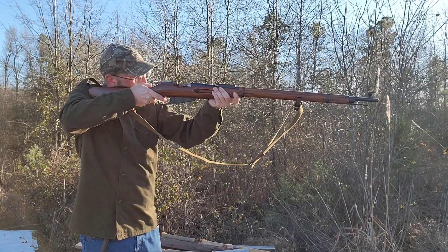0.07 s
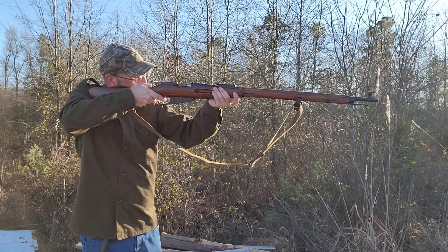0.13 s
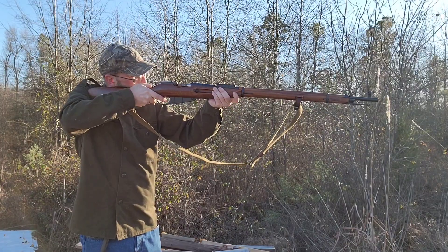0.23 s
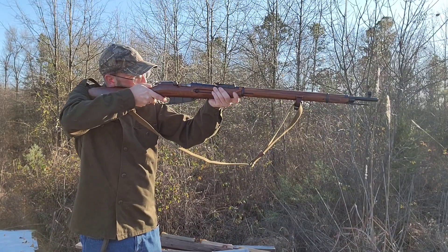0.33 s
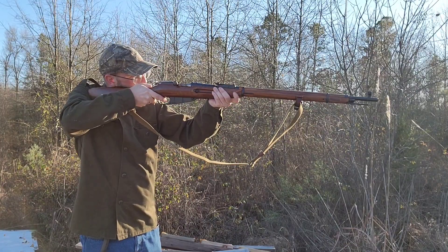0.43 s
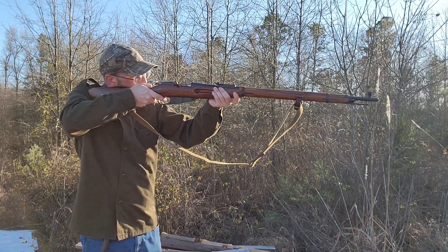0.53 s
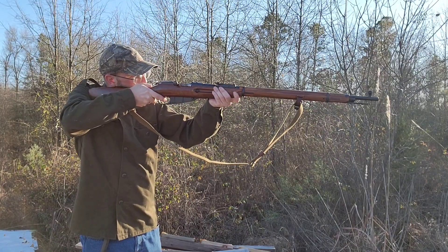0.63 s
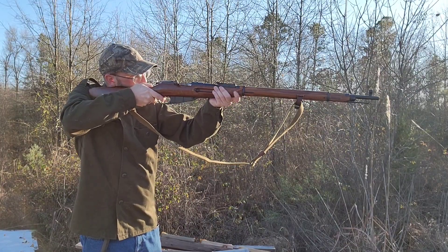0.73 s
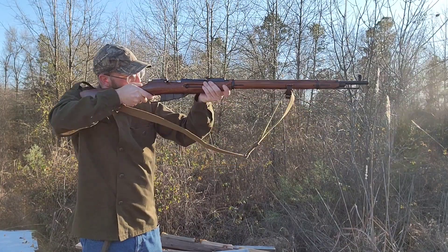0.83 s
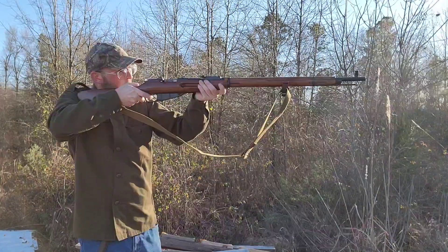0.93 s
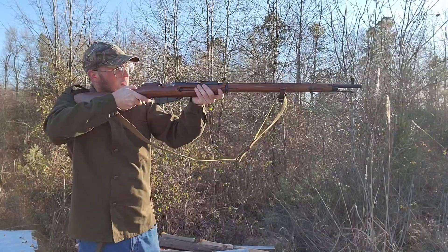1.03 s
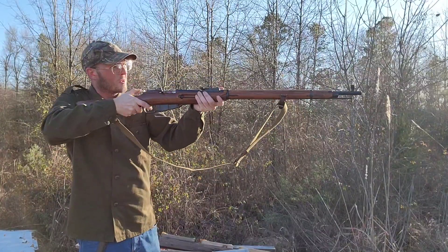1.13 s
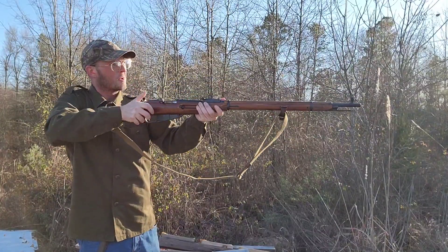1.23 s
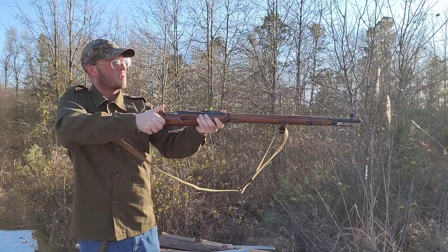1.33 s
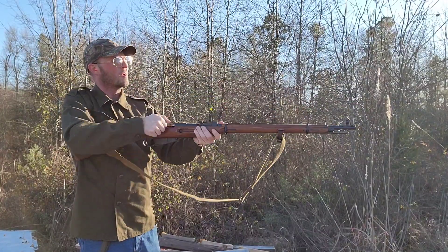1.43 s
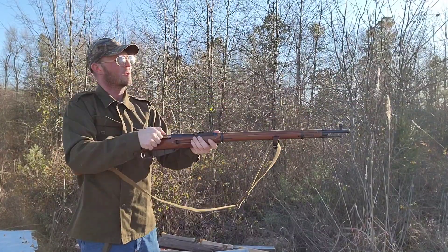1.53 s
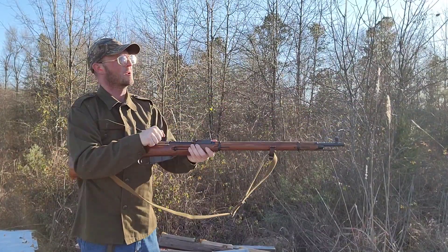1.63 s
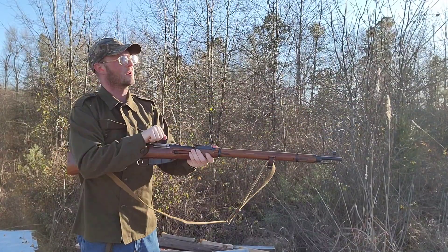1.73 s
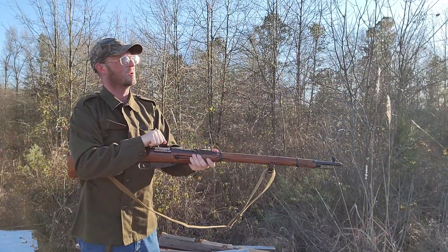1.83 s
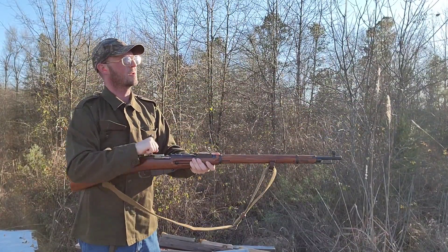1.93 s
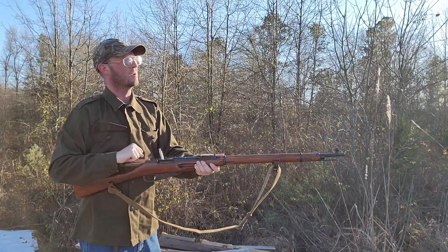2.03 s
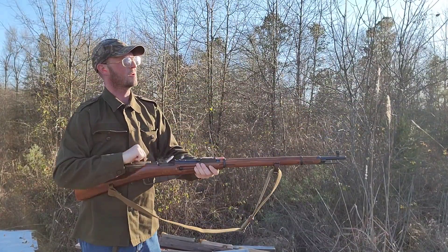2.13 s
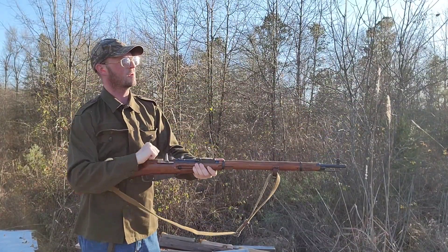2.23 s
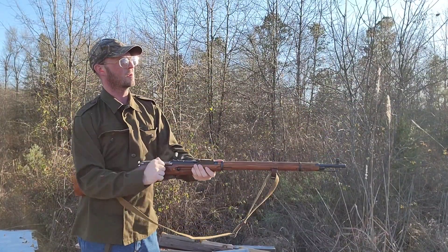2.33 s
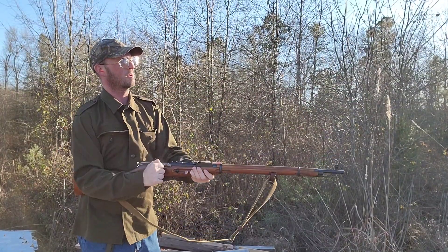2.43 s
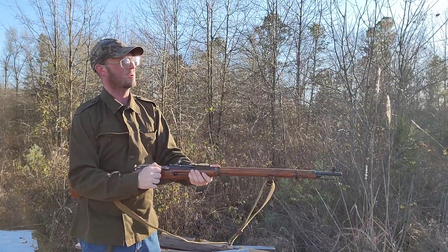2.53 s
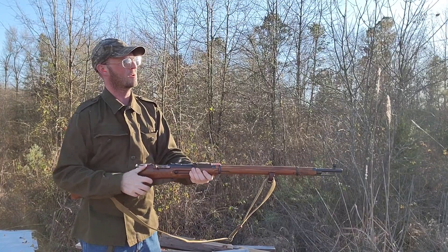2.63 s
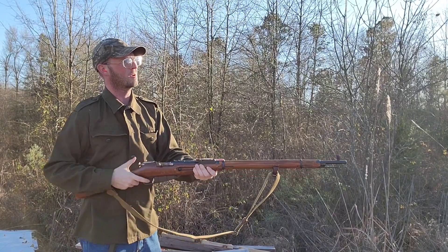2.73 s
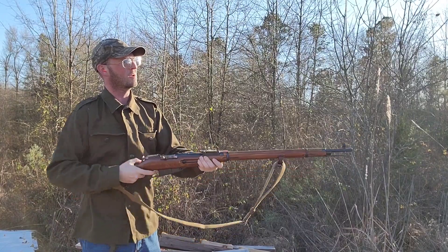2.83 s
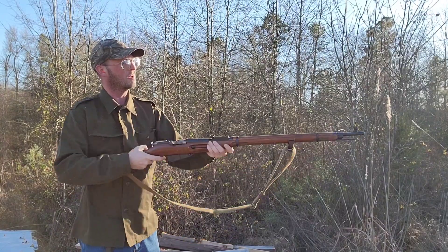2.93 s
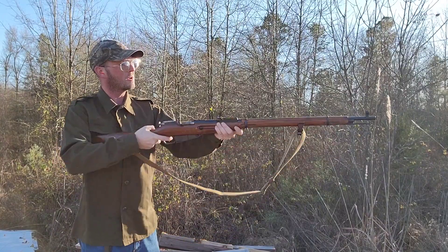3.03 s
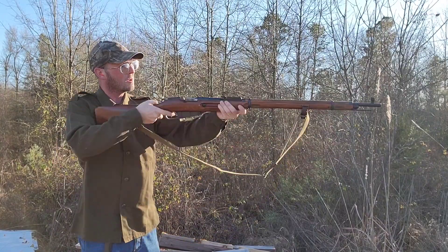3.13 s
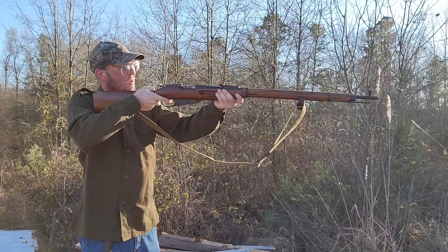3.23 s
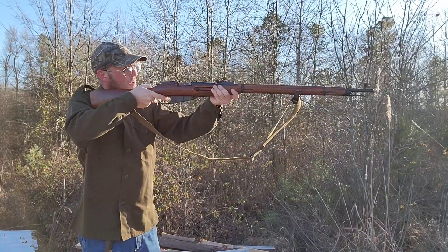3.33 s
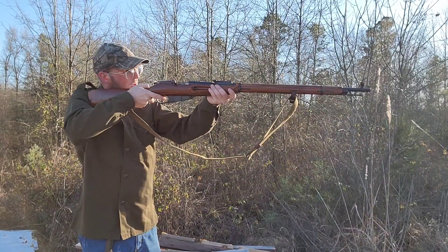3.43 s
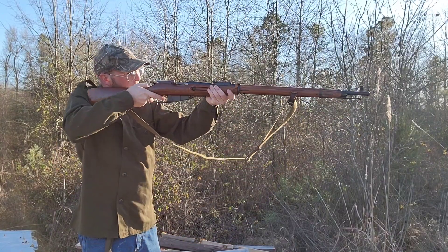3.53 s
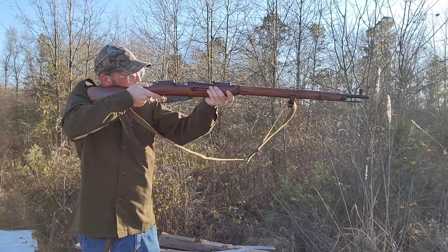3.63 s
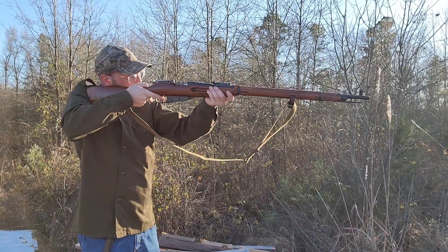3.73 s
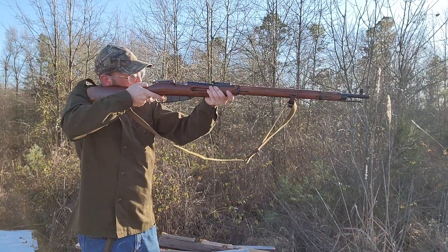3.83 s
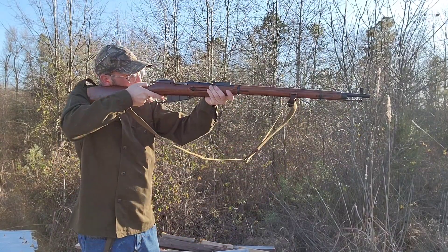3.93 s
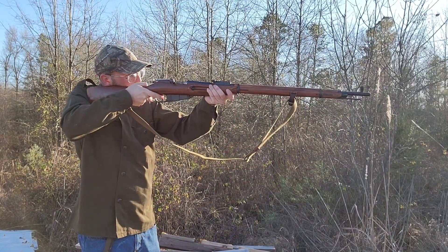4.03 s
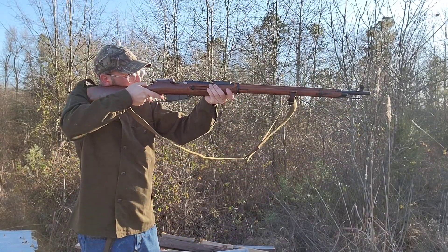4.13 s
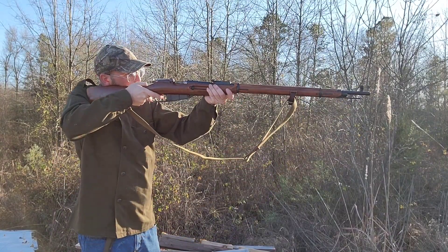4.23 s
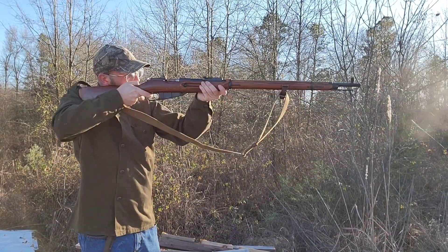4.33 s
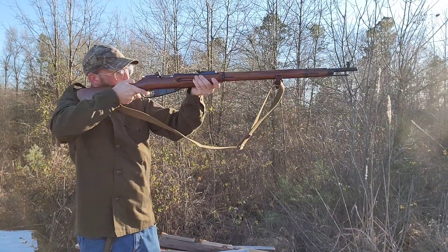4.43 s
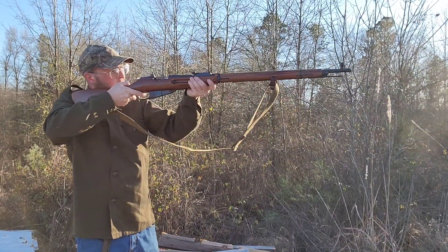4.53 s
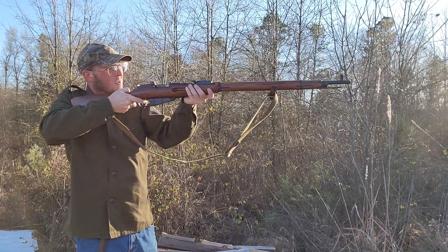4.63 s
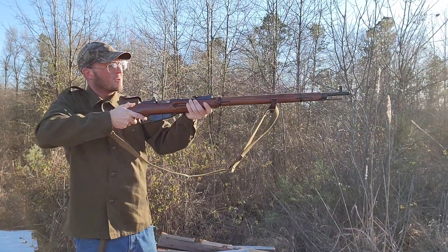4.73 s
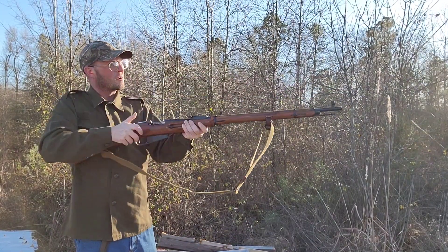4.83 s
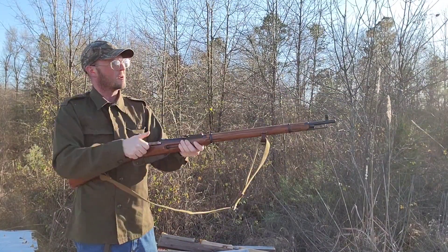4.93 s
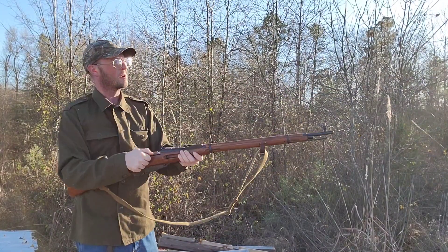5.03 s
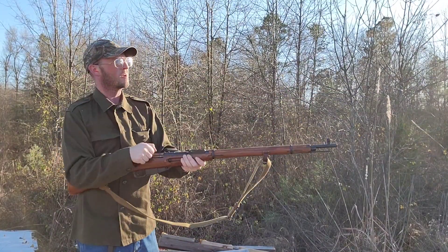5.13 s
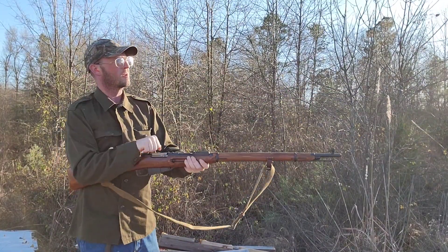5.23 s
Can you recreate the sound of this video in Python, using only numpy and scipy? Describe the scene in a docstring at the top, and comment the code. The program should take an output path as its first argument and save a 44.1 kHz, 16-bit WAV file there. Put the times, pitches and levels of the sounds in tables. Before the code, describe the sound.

Two loud close rifle blasts with deep booms and rolling woodland echoes; steel bolt clacks, a small clink and stock slaps separate them.

```python
"""At the edge of a wood, a bolt-action rifle is fired twice, a few steps from a pair of microphones.
Each blast is a dense noise burst with heavy air pushes, a deep boom and a hiss of twigs, then rolls away
among the trunks as scattered impulses; stands of trees answer with short pulses. Steel chatter makes the
bolt work after each shot, the second time faintly. Between the shots come resonant knocks on the stock, a
clinking case, a jingling sling ring and a brief strap swish, over rumbling wind and a faint outdoor hush."""
import sys
import numpy as np
from scipy import signal
from scipy.fft import rfft, irfft, next_fast_len
from scipy.io import wavfile
from scipy.ndimage import map_coordinates

SR = 44100
rng = np.random.default_rng(int(sys.argv[2]) if len(sys.argv) > 2 else 0)


def wav_out(sig):
    """Save sig, one row per channel (or a flat mono array), as 16-bit PCM at SR to the path in sys.argv[1]."""
    wavfile.write(sys.argv[1], SR, np.round(np.clip(np.atleast_2d(sig).T, -1, 1) * 32767).astype(np.int16))


N = 232620  # length in samples


def amp(db):
    """Decibels to gain."""
    return 10 ** (np.asarray(db) / 20)


def unit(x):
    """x at rms 1."""
    return x / np.sqrt(np.mean(x ** 2) + 1e-20)


def noise(n):
    """Independent white noise for the two microphones."""
    return rng.standard_normal((2, n))


def decay(t, t60):
    """Exponential fade that loses 60 dB in t60 seconds."""
    return amp(-60 * t / t60)


def along(points, hz):
    """(Hz, value) points read on a log frequency axis."""
    f, v = np.transpose(points)
    return np.interp(np.log(hz + 1), np.log(f + 1), v)


def clock(seconds):
    """Sample times from zero."""
    return np.arange(int(seconds * SR)) / SR


def add(track, s, sound):
    """Mix a sound into a stereo track at time s, cut at the track's end."""
    part = track[:, round(s * SR):][:, :sound.shape[-1]]
    part += sound[..., :part.shape[1]]


def filtered(x, response):
    """x through a frequency response, with padding so the ends do not wrap."""
    n = x.shape[-1]
    m = next_fast_len(n + 8192)
    return irfft(rfft(x, m) * response(np.fft.rfftfreq(m, 1 / SR)), m)[..., :n]


def coloured(x, spectrum):
    """x shaped by a (Hz, dB) spectrum, at rms 1."""
    return unit(filtered(x, lambda hz: amp(along(spectrum, hz))))


def band(x, lo_hz, hi_hz, order=2):
    """Causal band-pass."""
    return signal.sosfilt(signal.butter(order, [lo_hz, hi_hz], 'band', fs=SR, output='sos'), x)


def resonate(x, modes):
    """x through parallel (Hz, width, dB) resonances of alternating sign."""
    def response(f):
        total = 0
        for k, (centre, width, db) in enumerate(modes):
            damping = 1j * f * width
            total = total + (-1) ** k * amp(db) * damping / (centre * centre - f * f + damping)
        return total
    return filtered(x, response)


def ringing(modes, t, rise, uneven_db):
    """Stereo ring of (Hz, dB, t60) modes, at new strengths for every touch."""
    tones = 0
    for hz, db, t60 in modes:
        level = amp(db + uneven_db * rng.normal())
        phase = rng.uniform(0, 2 * np.pi) + np.array([[0], [1.2]])
        tones = tones + level * decay(t, t60) * np.sin(2 * np.pi * hz * t + phase)
    return tones * (1 - np.exp(-t / rise))


def faded(x, gain_db):
    """x under a gain that depends on frequency and time."""
    hz, t, z = signal.stft(x, SR, nperseg=256)
    z = z * amp(gain_db(hz[:, None], t))
    return signal.istft(z, SR, nperseg=256)[1][:, :x.shape[-1]]


def scatter(n, uneven_db, count=9000):
    """Tiny impulses from all around, count a second: each reaches the two microphones with its own lag."""
    k = count * n // SR
    at = rng.uniform(0, n, k)
    lag = .00025 * SR * np.cos(rng.uniform(0, 2 * np.pi, k))
    sign = rng.choice([-1, 1], k)
    size = sign * amp(uneven_db * np.clip(rng.standard_normal(k), -2, 2.4))
    sides = []
    for side in (-1, 1):
        arrival = np.clip(at + side * lag, 0, n - 1).astype(int)
        sides.append(np.bincount(arrival, size, n))
    return unit(np.array(sides))


def clumps(hz, age, width_hz, length):
    """Each clump of trees favours its own pitches: a smooth random field over frequency and time."""
    rows, columns = np.broadcast_arrays(hz / width_hz, age / length)
    return map_coordinates(rng.standard_normal((160, 800)), [rows, columns], order=2)


# The two shots. Each row: start in seconds, roar level in dB, woods level in dB, twig hiss level in dB,
# attack in seconds.
RIFLE_SHOTS = [(0.7581, -12.5, -28.5, -16, .016), (4.3095, -13, -29.5, -17.5, 0.021)]


def shots():
    """Both blasts: the direct roar, air pushes and boom, then what the twigs and trees send back."""
    out = np.zeros((2, N))
    for s, roar_db, woods_db, twigs_db, attack in RIFLE_SHOTS:
        add(out, s, amp(roar_db) * roar(attack))
        add(out, s, pushes(uneven_db=4))
        add(out, s, amp(roar_db - 10) * boom(spread_db=-3, t60=0.45))
        add(out, s, amp(twigs_db) * twigs())
        add(out, s, amp(woods_db) * woods())
        add(out, s, tree_lines())
    return band(out, lo_hz=41.3, hi_hz=21000)


# Colour of the close blast. Each row: frequency in Hz, density in dB per Hz.
ROAR_SPECTRUM = [(18, -35), (35, 0), (130, 1.5), (350, -7), (486, -13), (720, -10), (1160, -11.5),
                 (2600, -13.5), (3200, -16), (4800, -19.5), (7200, -19), (8400, -29), (10700, -26.5),
                 (12400, -15), (15400, -15.5), (16100, -24.5)]
# Resonances of the microphone housing. Each row: frequency in Hz, width in Hz, level in dB.
HOUSING_MODES = [(339, 24, 2.5), (715.5, 21, -1), (947, 23, -3.5), (1777, 30, -5), (2060, 100, -9.5),
                 (2370, 35, -9), (2980, 24, -7.5), (3186, 180, -6), (3560, 17, -9), (3900, 76, -7.5)]
# How long the roar holds. Each row: frequency in Hz, time until it starts to die in seconds.
ROAR_HOLD = [(100, 0.027), (700, 0.031), (2000, 0.019), (4500, .045), (14000, 0.078)]
# How the roar dies in the nearby brush. Each row: frequency in Hz, t60 in seconds.
BRUSH_FADE = [(60, .55), (200, 0.23), (700, 0.34), (2000, 0.42), (5000, .245), (14000, .19)]
# the roar swells from its onset and crests before it dies
ONSET_DB, CREST_DB, CREST_S, CREST_WIDTH_S = -25.5, 2.5, 0.037, .02


def roar(attack):
    """The blast close by: a dense burst that shakes the microphone housing; its top treble holds longest."""
    t = clock(.6)
    # the first front overloads each microphone in its own way
    overload = amp(2) * decay(np.maximum(t - .03, 0), 0.15)
    front = scatter(len(t), uneven_db=4.5, count=30000) + overload * noise(len(t))
    burst = coloured(front / np.hypot(1, overload), ROAR_SPECTRUM)
    housing = unit(resonate(noise(len(t)), HOUSING_MODES))
    burst = burst + amp(-5.0) * housing

    def dying_db(hz, age):
        return -60 * np.maximum(age - along(ROAR_HOLD, hz), 0) / along(BRUSH_FADE, hz)
    burst = faded(burst, dying_db)
    onset_db = ONSET_DB * np.maximum(1 - t / attack, 0)
    crest_db = CREST_DB * np.exp(-((t - CREST_S) / CREST_WIDTH_S) ** 2)
    return burst * amp(onset_db + crest_db)


# first pressure push, time to the next, first length
PUSH_DELAY_S, PUSH_GAP_S, PUSH_LENGTH_S = .0205, .0105, .0016
# the nominal level falls by the loss and the length grows by this factor from push to push
PUSH_DB, PUSH_LOSS_DB, PUSH_GROWS = -4, 3, 1.2


def pushes(uneven_db, count=4):
    """Heavy pushes of air, each longer and on average weaker: overpressure, then a longer suction."""
    out, t = np.zeros((2, SR // 4)), clock(.06)
    for k in range(count):
        u = t / (PUSH_LENGTH_S * PUSH_GROWS ** k)
        size = amp(PUSH_DB - PUSH_LOSS_DB * k + uneven_db * rng.standard_normal((2, 1)))
        wave = (1 - u) * np.exp(-u) * (1 - np.exp(-t / .00019))
        start = PUSH_DELAY_S + PUSH_GAP_S * (k + rng.uniform(-.2, .2))
        add(out, start, size * wave)
    return out


def boom(spread_db, t60):
    """The deep body of the blast rolls along the ground, partly shared by the microphones, partly not."""
    t = clock(0.35)
    mid, side = band(noise(len(t)), 45, 105)
    depth = unit(mid + amp(spread_db) * np.array([side, -side]))
    return depth * np.clip((t - .005) / .015, 0, 1) * decay(t, t60)


# Colour of the hiss off the twigs. Each row: frequency in Hz, density in dB per Hz.
TWIG_SPECTRUM = [(1200, -53.5), (2400, -8), (3300, -0.5), (5500, 1), (7000, -6), (9000, -28)]


def twigs():
    """The wall of bare twigs behind the shooter throws back a hiss just after the blast."""
    t = clock(.4)
    hiss = coloured(scatter(len(t), uneven_db=1.5, count=20000), TWIG_SPECTRUM)
    arrival = np.clip((t - .04) / 0.0087, 0, 1)
    return hiss * arrival * decay(np.maximum(t - .06, 0), .22)


# Colour of the roll among the trunks. Each row: frequency in Hz, density in dB per Hz.
WOODS_SPECTRUM = [(18, -45), (30, -19.5), (70, -10.5), (130, -0.5), (200, -2.5), (287, -11), (461, -10),
                  (721, -7.5), (822, -10), (1190, -9.5), (2410, -19.5), (3490, -21), (4780, -31.5),
                  (7090, -34), (8520, -46.5), (13300, -37.5), (16000, -43)]
# How the roll dies away. Each row: frequency in Hz, t60 in seconds.
WOODS_FADE = [(50, 5.5), (130, 0.66), (300, 2.01), (700, 2.81), (1500, 2.28), (3000, 1.25), (5500, 0.9),
              (9000, 0.68), (14000, 0.73)]


def woods():
    """Countless trunks return the blast; the longer the path, the more treble the air takes."""
    t = clock(3)
    thin = scatter(len(t), uneven_db=1.5, count=4000)
    thick = unit(band(scatter(len(t), uneven_db=3, count=140), 200, 2500, order=1))
    trunks = coloured(thin + amp(-14 - 8 * t) * thick, WOODS_SPECTRUM)
    # near trees answer in lumps; far ones blend into an even roll
    patchy_db = [(150, 2.5), (500, 4.5), (1800, 4), (5000, 1.5), (12000, 1)]  # (Hz, dB)

    def lumps_db(hz, age):
        return along(patchy_db, hz) * np.exp(-age / .9) * clumps(hz, age, width_hz=450, length=.012)
    trunks = unit(faded(trunks, lumps_db))

    # the fade is neutral about a quarter second out; earlier echoes are brighter, later ones darker
    def dying_db(hz, age):
        return -60 * (np.maximum(age, .09) - .27) / along(WOODS_FADE, hz)
    return faded(trunks, dying_db) * np.minimum(t / .095, 1) ** 2


# Dense stands of trees that answer every shot. Each row: delay after the shot in seconds, boom level in dB.
TREE_ECHOES = [(.147, -22.5), (.185, -21.5), (.286, -31), (.399, -24), (.443, -27.5), (.53, -27),
               (.682, -26.5), (0.937, -33)]
BOOM_HZ, SLAP_HZ = 120, 490  # each answer is a low boom with a slap on top, its pitch varied around this
SLAP_DB, SLAP_LOSS_DB_PER_S = 10, 23  # slap over boom; the longer the path, the less is left of it


def pulse(cycles):
    """A rounded, quickly dying sine pulse."""
    return np.sin(2 * np.pi * cycles) * 2 * cycles * np.exp(1 - 2 * cycles)


def tree_lines():
    """Each dense stand of trees throws back a rounded boom and a slap that weakens with distance."""
    back, t = np.zeros((2, 2 * SR)), clock(0.046)
    for delay, db in TREE_ECHOES:
        slap_hz = SLAP_HZ * np.exp(.2 * rng.normal())
        slap = amp(SLAP_DB - SLAP_LOSS_DB_PER_S * delay) * pulse(t * slap_hz)
        add(back, delay, amp(db) * (pulse(t * BOOM_HZ) + slap))
    return back


# Colour of steel on steel. Each row: frequency in Hz, density in dB per Hz.
STEEL_SPECTRUM = [(180, -55), (300, -4.5), (584, -4), (1340, -2.5), (1970, -27), (2320, 1.5), (2740, -8),
                  (3890, -4), (4520, -12.5), (5900, -9.5), (6960, -7.5), (8360, -25), (11900, -7),
                  (14700, -4), (16000, -7.5)]
# Ringing modes of the receiver. Each row: frequency in Hz, width in Hz, level in dB before uneven touches.
RECEIVER_MODES = [(1510, 400, -0.5), (2210, 300, -4.5), (3000, 92, -8.5), (3820, 28, 6.5), (5100, 240, -11),
                  (5550, 220, -2), (6040, 47, -15.5), (7270, 190, 1.5)]


def steel(n, ringing_db):
    """Chatter of steel on steel; each touch rings the receiver's modes at new strengths."""
    chatter = scatter(n, uneven_db=3, count=14000)
    modes = [(hz, width, db + rng.normal(0, 4)) for hz, width, db in RECEIVER_MODES]
    return unit(coloured(chatter, STEEL_SPECTRUM) + amp(ringing_db) * unit(resonate(chatter, modes)))


# The bolt meets its stops. Each row: start in seconds, clack level in dB, low weight over the clack in dB,
# sizzle over the clack in dB, t60 in seconds.
BOLT_CONTACTS = [(1.424, -56.5, -6, -3, 0.037), (1.449, -54.5, -8, 9.5, .025), (1.618, -38, -15, 3, 0.039),
                 (1.7478, -17.5, -5.5, 6, 0.024), (1.9414, -38, -4.5, -1, 0.022),
                 (1.9702, -33, -4, -2.5, 0.058), (2.0225, -19, -8.5, 1.5, 0.023),
                 (2.038, -14, -10, 3, 0.032), (2.1146, -42, -13, -4.5, .03),
                 (2.1849, -37, -18.5, -1.5, .035), (2.2303, -26.5, -18.5, 0.5, 0.024),
                 (2.251, -26, -16, -5, 0.037), (2.3144, -13.5, -10.5, 3, .025),
                 (2.345, -26.5, -24, 14.5, 0.0074), (2.363, -19.5, -6.5, 1, 0.03),
                 (5.1392, -43.5, -14, 11.5, 0.046), (5.186, -39.5, -17, 7.5, 0.029)]
# Scrapes of the bolt in its race; the second row is a brief scrape leading straight into a clack. Each row:
# start in seconds, end in seconds, level in dB.
BOLT_SCRAPES = [(1.626, 1.646, -48), (1.734, 1.754, -38), (1.992, 2.045, -32), (2.24, 2.31, -30.5),
                (2.317, 2.376, -37.5), (5.146, 5.234, -59), (5.258, 5.279, -58)]
CONTACT_RISE_S = 0.00067  # time constant of every contact's build-up


def bolt():
    """Working the bolt: contacts chatter briefly, damped by the hands, among uneven scrapes."""
    out, t = np.zeros((2, N)), clock(.12)
    for s, db, weight_db, sizzle_db, t60 in BOLT_CONTACTS:
        metal = steel(len(t), ringing_db=-5.5)
        weight = amp(weight_db) * unit(band(metal[0], 950, 1614, order=3))
        clack = unit(band(metal, 1600, 8000, order=3))
        sizzle = amp(sizzle_db) * unit(band(metal, 9570, 17000, order=3))
        sizzle = sizzle * amp([[-2], [2]])  # leans to the right
        blow = decay(t, t60) * (1 - np.exp(-t / CONTACT_RISE_S))
        add(out, s, amp(db) * (clack + weight + sizzle) * blow / blow.max())
    for start, end, db in BOLT_SCRAPES:
        t = clock(end - start)
        flicker = map_coordinates(rng.standard_normal(80), [t * 350])  # grips and lets go
        scrape = band(steel(len(t), ringing_db=-4.5), 1500, 16500) * amp(3.4 * flicker)
        add(out, start, amp(db) * unit(scrape) * signal.windows.tukey(len(t), .2))
    return out


# The cartridge clinks as it rises and feeds. Each row: start in seconds, level in dB.
CARTRIDGE_CLINKS = [(2.188, -33), (2.2315, -32), (2.252, -30.5)]
# Modes of the brass case. Each row: frequency in Hz, level in dB before uneven touches, t60 in seconds.
BRASS_MODES = [(2430, -1, 0.02), (2536, 2, 0.021)]


def cartridge():
    """The brass case gives a short clink of two close modes that beat."""
    out, t = np.zeros((2, N)), clock(.06)
    for s, db in CARTRIDGE_CLINKS:
        add(out, s, amp(db) * ringing(BRASS_MODES, t, rise=.001, uneven_db=3))
    return out


# The hand slams the bolt home and slaps back onto the stock. Each row: start in seconds, knock peak in dB,
# thump peak in dB, slap peak in dB.
STOCK_KNOCKS = [(2.3629, -26, -45, -38.5), (2.8723, -20, -34, -28), (2.8854, -24, -29.5, -44)]
# Modes of the stock. Each row: frequency in Hz, width in Hz, level in dB.
STOCK_MODES = [(160.3, 55, -5.5), (242, 50, -5.5), (324.7, 65, 1), (480, 66, -3), (796, 160, -1.5),
               (1280, 146, 0), (1660, 270, -7.5), (2196, 300, -6.5), (2600, 440, -6.5), (3430, 900, -14.5)]
# Dull taps as the rifle comes up. Each row: start in seconds, peak in dB.
HOLLOW_TAPS = [(3.1008, -31), (3.114, -37.5), (3.177, -41), (3.208, -36.5), (3.272, -45.5), (3.368, -52)]
# Modes of the hollow taps. Each row: frequency in Hz, width in Hz, level in dB.
HOLLOW_MODES = [(169.6, 135, -3.5), (341, 45, 3), (477, 78, -5.5), (734, 96, 3.5), (910, 57, 7),
                (1400, 380, -6), (1950, 450, -22)]


def peaking(x, db):
    """x with its highest peak at db."""
    return amp(db) * x / np.abs(x).max()


def stock():
    """A slap on the stock is a soft thump, a short wooden ring and the smack of skin; taps sound hollow."""
    out, t = np.zeros((2, N)), clock(0.23)

    def touch(t60):
        return scatter(len(t), uneven_db=2.0) * decay(t, t60)
    for s, knock_db, thump_db, slap_db in STOCK_KNOCKS:
        add(out, s, peaking(resonate(touch(t60=0.039), STOCK_MODES), knock_db))
        add(out, s, peaking(band(touch(t60=0.063), 49, 210), thump_db))
        add(out, s, peaking(band(touch(t60=0.021), 1630, 4900, order=1), slap_db))
    for s, db in HOLLOW_TAPS:
        hollow = resonate(touch(t60=0.033), HOLLOW_MODES)
        add(out, s, peaking(band(hollow, 110, 2950), db))
    return out


# Jingles of the sling ring. Each row: start in seconds, level in dB.
RING_JINGLES = [(2.1151, -38.5), (2.1854, -31.5), (2.8739, -45), (3.31, -52.5), (3.491, -68), (3.5905, -74),
                (3.7074, -66.5), (3.7753, -65), (3.929, -66)]
# Modes of the sling ring. Each row: frequency in Hz, level in dB before uneven touches, t60 in seconds.
RING_MODES = [(10180, -12.5, 0.17), (13100, -22.5, .12), (14130, 0.5, .11)]
TICK_DB, TICK_T60_S = -11.5, 0.022  # the touch that sets it ringing


def sling_ring():
    """A small steel ring: a noise tick at the touch, then high decaying pings."""
    out, t = np.zeros((2, N)), clock(.3)
    for s, db in RING_JINGLES:
        tick = amp(TICK_DB) * decay(t, TICK_T60_S) * unit(band(noise(len(t)), 2700, 5300))
        pings = ringing(RING_MODES, t, rise=0.00029, uneven_db=2)
        add(out, s, amp(db) * (tick + pings))
    return out


SWISH_AT_S, SWISH_LENGTH_S, SWISH_DB = 3.048, 0.021, -44.5  # level before the swell window


def strap():
    """The sling strap's webbing swishes over the jacket: a brief swell of band-passed noise."""
    out, t = np.zeros((2, N)), clock(SWISH_LENGTH_S)
    fibres = unit(band(noise(len(t)), 4360, 7400))
    add(out, SWISH_AT_S, amp(SWISH_DB) * fibres * np.hanning(len(t)))
    return out


def clearing(x, wet_db, t60):
    """Ground and brush answer the small sounds faintly: a decaying noise tail, softer in the treble."""
    t = clock(0.3)
    tail = noise(len(t)) * decay(t, t60) * (t > .005)
    tail = tail / np.linalg.norm(tail[0])
    tone = [(1000, 3), (6000, -1.5), (14000, -8.5)]  # (Hz, dB)
    tail = filtered(tail, lambda hz: amp(along(tone, hz)))
    return x + amp(wet_db) * signal.fftconvolve(x, tail, axes=1)[:, :N]


# Wind on the microphones before gusts. Each row: time in seconds, level in dB, left over right in dB.
WIND_LEVELS = [(0, -49.5, -8), (.45, -57.5, -7.5), (.8, -51, 0.5), (2.6, -53, 0.5), (2.8, -59.5, -0.5),
               (3.15, -55.5, -4), (3.5, -64.5, 2), (3.7, -54.5, 7.5), (4, -58.5, -3.5), (5.27, -53.5, -3)]
# Colour of the wind rumble. Each row: frequency in Hz, density in dB per Hz.
RUMBLE_SPECTRUM = [(15, -30), (25, -9.5), (45, -6.5), (66, 0), (100, -7), (125, -19), (170, -30),
                   (250, -41.5), (500, -120)]
# Colour of the outdoor hush. Each row: frequency in Hz, density in dB per Hz.
AIR_SPECTRUM = [(120, -38), (200, -18), (305, -3.5), (380, -2.5), (465, -8), (579, -6), (968, -11.5),
                (3490, -14.5), (7270, -24), (9930, -35), (16000, -32)]


def breeze():
    """Wind rumbles on each microphone separately, over a faint outdoor hush."""
    t = np.arange(N) / SR
    gusts_db = 2.8 * map_coordinates(rng.standard_normal(60), [t * 8])
    times, levels, pans = np.transpose(WIND_LEVELS)
    wind_db = np.interp(t, times, levels)
    pan_db = np.interp(t, times, pans)
    gain = amp(wind_db + gusts_db + np.array([pan_db, -pan_db]) / 2)
    rumble = gain * coloured(noise(N), RUMBLE_SPECTRUM)
    hush = amp(-71.0) * coloured(scatter(N, uneven_db=-2, count=30000), AIR_SPECTRUM)
    return rumble + hush


def scene():
    """Shots, the handling of the rifle and the wind."""
    handling = clearing(bolt() + cartridge() + stock() + strap(), wet_db=-13.5, t60=0.15)
    return shots() + handling + sling_ring() + breeze()


TOP_HZ = 15950  # steep upper band limit


def record(dry):
    """The microphone chain rounds off the highest peaks and keeps almost nothing above its band limit."""
    rounded = dry / (1 + np.abs(dry) ** 6) ** (1 / 6)
    return filtered(rounded, lambda hz: 1 / np.sqrt(1 + (hz / TOP_HZ) ** 160))


dry = scene()
out = record(dry)
wav_out(out)
```